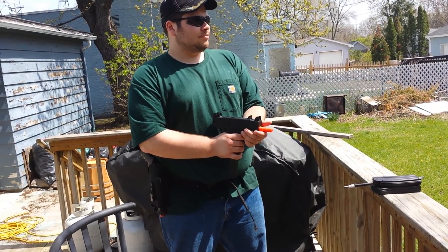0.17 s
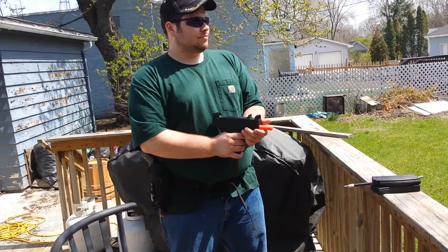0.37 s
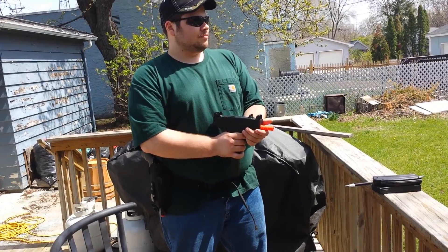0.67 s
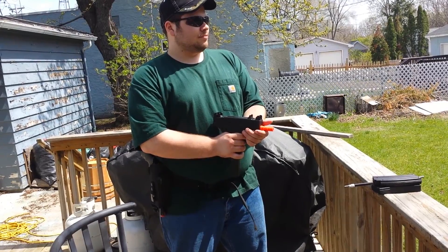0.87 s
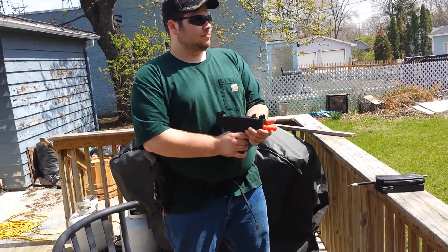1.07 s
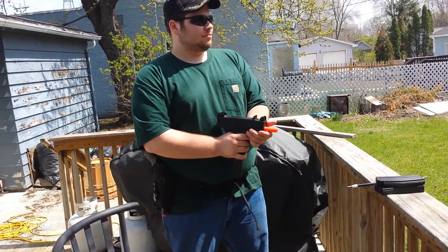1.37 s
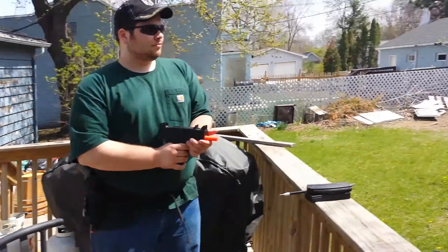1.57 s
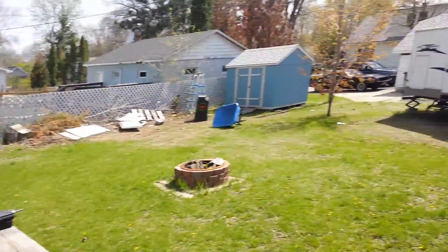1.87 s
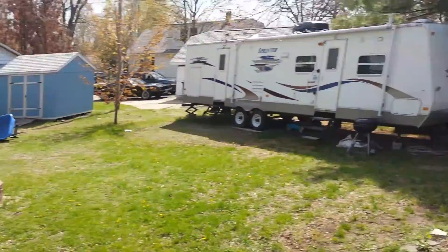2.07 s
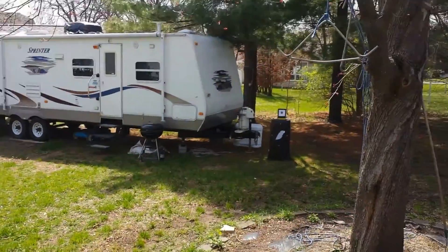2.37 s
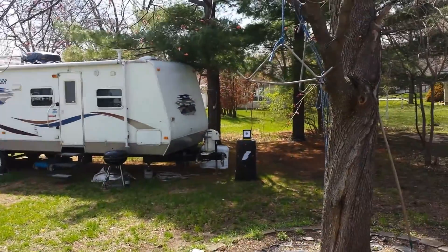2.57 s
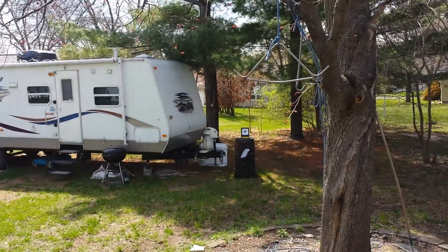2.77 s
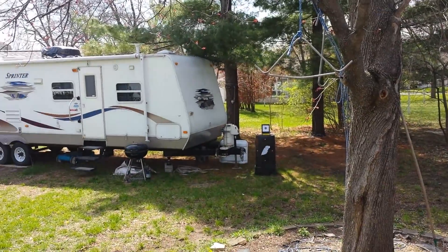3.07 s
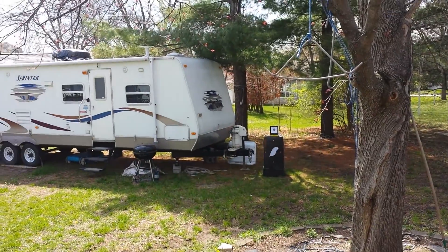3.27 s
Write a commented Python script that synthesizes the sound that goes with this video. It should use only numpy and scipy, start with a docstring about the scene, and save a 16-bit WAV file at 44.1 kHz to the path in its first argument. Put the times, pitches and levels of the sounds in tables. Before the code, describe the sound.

Close outdoor stereo pickup of an airsoft gun: light motor whirr, about three seconds of rapid snapping slams with whining gears and short yard reflections, tone shifting as the microphone turns, then a final whirr.

```python
"""In a backyard with faint air, an electric airsoft motor whirrs lightly, then the gun fires on full auto.
About eight times a second the piston slams into the plastic shell, and an action clack precedes most slams.
After each slam the gears whine as they wind the spring; walls and trees answer; one shot puffs on the ports.
Midway the microphone swings away: the gun changes colour, shifts in stereo and shows a low hum.
After the last shot the motor's whirr, made of grainy noise, returns. Contacts are noise and decaying modes."""
import sys
import numpy as np
from scipy import signal
from scipy.fft import rfft, irfft, next_fast_len
from scipy.io import wavfile
from scipy.ndimage import uniform_filter1d

SR = 44100
rng = np.random.default_rng(int(sys.argv[2]) if len(sys.argv) > 2 else 0)


def unload_audio(sound):
    """Save the sound as a 16-bit wav file, at the path given as the first command line argument."""
    columns = np.transpose(np.atleast_2d(sound))
    # keep every value between -1 and 1, then stretch to whole-number steps
    steps = np.round(np.clip(columns, -1, 1) * 32767)
    wavfile.write(sys.argv[1], SR, steps.astype(np.int16))


N = 152145  # length in samples
ALIKE = 0.47  # share of noise power common to both ports


def amp(db):
    """Decibels to linear amplitude."""
    return 10 ** (np.asarray(db) / 20)


def unit(x):
    """Scale to rms 1 over the whole array."""
    return x / np.sqrt(np.mean(x ** 2) + 1e-20)


def levelled(x, span_s):
    """Scale x to rms 1 over its first moments."""
    return x / np.sqrt(np.mean(x[:, :int(span_s * SR)] ** 2) + 1e-20)


def along(points, hz):
    """Read (frequency [Hz], value) points on a log frequency axis."""
    point_hz, value = np.transpose(points)
    return np.interp(np.log(hz + 1), np.log(point_hz + 1), value)


def curve(rows):
    """One value per sample from (time [s], value) rows."""
    return np.interp(np.arange(N) / SR, *np.transpose(rows))


def filtered(x, response):
    """Multiply the spectrum of x by a response of frequency."""
    n = x.shape[-1]
    padded = next_fast_len(n + 4096)
    gain = response(np.fft.rfftfreq(padded, 1 / SR))
    return irfft(rfft(x, padded) * gain, padded)[..., :n]


def coloured(x, points, size=2048):
    """Shape a stereo pair with a causal, minimum-phase filter from (frequency [Hz], level [dB])."""
    cepstrum = irfft(np.log(amp(along(points, np.fft.rfftfreq(size, 1 / SR)))))
    cepstrum[1:size // 2] *= 2
    cepstrum[size // 2 + 1:] = 0
    impulse = irfft(np.exp(rfft(cepstrum)))
    return signal.fftconvolve(x, impulse[None], axes=1)[:, :x.shape[1]]


def pair(n, alike=ALIKE):
    """White noise, partly alike at the two ports."""
    z, alike = rng.standard_normal((3, n)), np.clip(alike, 0, 1)
    return np.sqrt(alike) * z[0] + np.sqrt(1 - alike) * z[1:]


def wobble(hz):
    """A random curve of rms 1 that moves up to about this rate."""
    return unit(filtered(rng.standard_normal(N), lambda f: 1 / (1 + (f / hz) ** 2)))


# Colour of the still outdoor air: (frequency [Hz], relative level [dB])
AIR_COLOUR = [(25, -23), (60, -14), (105, -2.5), (170, -8.5), (400, -9.5), (1000, -11.5), (3000, -22),
              (14000, -40)]
AIR_DB = -63


def air():
    """Still outdoor air as a faint, steady, coloured noise."""
    return amp(AIR_DB) * unit(coloured(pair(N), AIR_COLOUR))


# Loudness of the whirr before, during and after the burst: (time [s], level [dB])
WHIRR_LEVEL = [(0, -42), (.055, -40.5), (.11, -52.5), (.17, -60.5), (.25, -61), (3.19, -68), (3.235, -38.5),
               (3.29, -30.5), (3.34, -33), (3.45, -32.5)]
# Colour of the whirr: (frequency [Hz], relative level [dB])
WHIRR_COLOUR = [(400, -24), (720, -46), (950, -19), (1550, -18), (2150, -4.5), (2700, -9.5), (3400, -21.5),
                (4770, -6), (6500, -1), (8600, -10), (14500, -19.5)]


def whirr():
    """The motor spinning with little load: a fine, grainy hiss."""
    grain = amp(1.7 * wobble(190))
    hiss = unit(coloured(rng.standard_normal((2, N)) * grain, WHIRR_COLOUR))
    return amp(curve(WHIRR_LEVEL)) * hiss


# Progress of the microphone's swing: (time [s], share of the swing)
TURN = [(1.6, 0.0041), (1.95, 0.28), (2.3, .9), (2.6, 0.99)]
LAG_S = .0005  # between the two ports at full swing


def add(out, s, x):
    """Mix in a sound; the left port hears it later as the microphone turns away."""
    lag = LAG_S * np.interp(s, *np.transpose(TURN))
    for port, start in enumerate((s + lag / 2, s - lag / 2)):
        part = out[port, int(start * SR):][:x.shape[1]]
        part += x[port, :len(part)]


def ring(modes, t):
    """Decaying modes, struck a little differently each time and heard differently at each port."""
    hz, db, t60 = np.transpose(modes)[:, :, None]
    z = rng.standard_normal((4, len(modes), 1))
    detuned_hz = hz * (1 + 0.01 * z[0])
    phase = 2 * np.pi * detuned_hz * t + hz / 8000 * z[2:]
    decay = amp(db + 1.95 * z[1] - 60 * t / t60)
    onset = 1 - np.exp(-t / 0.00033)
    return (decay * np.sin(phase)).sum(1) * onset


# Ringing gearbox: (frequency [Hz], relative level [dB], t60 [s])
GEARBOX_MODES = [(4596, -10, 0.035), (5066, -6, 0.018), (5703, -1.5, 0.026), (5850, -2, 0.023),
                 (6350, -3, 0.016), (6800, -3.5, 0.0083), (7390, -5, 0.051), (9890, -12.5, 0.031)]
# Ringing plastic shell: (frequency [Hz], relative level [dB], t60 [s])
SHELL_MODES = [(744, -12.5, 0.028), (1068, -2, 0.026), (1254, -9, 0.05), (1450, -4.5, 0.03),
               (1946, 3, .032), (2230, 0.5, 0.025)]
# Colour of the bright contact snap: (frequency [Hz], relative level [dB])
SNAP_COLOUR = [(1500, -47), (2800, -24), (4000, -18), (5200, -4.5), (6400, 0.5), (7300, -3), (8300, -13.5),
               (11000, -14), (14500, -24.5)]
# Colour of the knock on the shell: (frequency [Hz], relative level [dB])
KNOCK_COLOUR = [(200, -31), (600, -16), (1050, -2), (1600, -5.5), (2000, 1), (2800, -11), (3500, -8),
                (5000, -24)]
CRACK_HZ, CRACK_RISE_S = 6427, 0.00014  # the nearly pitched crack of each contact
KNOCK_ALIKE = 0.81  # share of knock power common to both ports


def impact(rows, voice):
    """Hard contacts: a crack, a bright snap and their rebound ring the gearbox, and the shell knocks."""
    crack_db, snap_db, snap_t60, gearbox_db, knock_db, knock_t60, shell_db = voice
    out, t = np.zeros((2, N)), np.arange(SR // 16) / SR
    u = t / CRACK_RISE_S
    for s, first_db, rebound_ms, rebound_db, body_db, *_ in rows:
        for at, db in ((s, first_db), (s + rebound_ms / 1e3, rebound_db)):
            hz = CRACK_HZ * (1 + .035 * rng.standard_normal())
            port_phase = 0.48 * rng.standard_normal((2, 1))
            crack = u ** 2 * np.exp(-u) * np.sin(2 * np.pi * hz * t + port_phase)
            # a very short burst on top of a longer tail
            snap_decay = amp(-60 * t / snap_t60) + 1.14 * amp(-60 * t / 0.0024)
            snap = coloured(pair(len(t)) * snap_decay, SNAP_COLOUR)
            parts = ((crack_db, crack), (snap_db, snap), (gearbox_db, ring(GEARBOX_MODES, t)))
            add(out, at, sum(amp(db + part_db) * levelled(part, 0.0012) for part_db, part in parts))
        knock = coloured(pair(len(t), KNOCK_ALIKE) * amp(-60 * t / knock_t60), KNOCK_COLOUR)
        knock = amp(knock_db) * levelled(knock, 0.014)
        shell = amp(shell_db) * levelled(ring(SHELL_MODES, t), 0.0086)
        add(out, s, amp(body_db) * (knock + shell))
    return out


# Clacks of the action, levels before the voice mix: (time [s], snap level [dB], rebound delay [ms],
# rebound level [dB], shell knock level [dB])
CLACKS = [(0.2221, -14.5, 1.54, -13, -27.5), (0.3574, -11, 1.65, -19.9, -27.5),
          (0.4744, -23.4, 4.37, -30.4, -35), (0.597, -11.5, 1.8, -19.9, -30.5),
          (0.7173, -11, 1.5, -21, -30.5), (0.8368, -13, 2.0, -24, -33.5), (0.957, -13.5, 2.11, -22, -32),
          (1.0776, -12.5, 2.0, -18.3, -32), (1.195, -29, 1.37, -43, -39.5), (1.315, -27, 2, -33, -37.8),
          (1.4395, -14.5, 2.0, -20, -31.5), (1.56, -14, 1.7, -19.8, -34), (1.6808, -12, 1.44, -21, -33),
          (1.8037, -9, 2.0, -18, -30.5), (1.9225, -14.5, 1.4, -18, -30.5), (2.0385, -27, 1.6, -29, -38.5),
          (2.1631, -10.5, 3.0, -31, -29.5), (2.283, -12, 2.8, -29, -34.5), (2.4032, -14.5, 1.8, -19, -31.5),
          (2.7668, -16, 2.3, -23, -32), (3.127, -17, 1.295, -20, -30)]
# Mix of a clack: (crack level [dB], snap level [dB], snap t60 [s], gearbox ring level [dB],
# knock level [dB], knock t60 [s], shell ring level [dB])
CLACK_VOICE = (0, -7, 0.04, -13, -4.5, 0.06, -1.5)


def action():
    """The action clacks just before most slams: hard contacts ring the gearbox and shell."""
    return impact(CLACKS, CLACK_VOICE)


# Piston slams, contact levels before the voice mix: (time [s], snap level [dB], rebound delay [ms],
# rebound level [dB], shell knock level [dB], thump level [dB], thump frequency [Hz])
SHOTS = [(0.2582, -13.5, 4.1, -15, -31, -41.5, 296), (0.3797, -12, 3.6, -16, -30, -40, 275),
         (0.4995, -10.5, 3.74, -10, -24.4, -44, 362), (0.6209, -13.5, 2.0, -15, -27.5, -42.3, 284),
         (0.7402, -7.5, 1.7, -16, -24, -44.5, 386), (0.8607, -9, 1.85, -13, -26, -46, 384),
         (0.9807, -9.5, 1.56, -11.5, -25.5, -44, 355), (1.101, -8, 1.6, -11.5, -25, -48.5, 346),
         (1.2204, -5.5, 2.2, -12, -26, -37, 235), (1.341, -9.5, 1.46, -10, -25, -64, 440),
         (1.4639, -16, 4.5, -16.5, -31.5, -42, 314), (1.5839, -8, 1.54, -11, -24, -43.1, 350),
         (1.7039, -5.5, 1.85, -11.2, -25, -50.5, 333), (1.825, -7.0, 1.4, -8.5, -23.5, -42, 337),
         (1.945, -12.5, 2.6, -11.5, -24.5, -43.5, 300), (2.0652, -10, 1.7, -5.5, -24, -55, 340),
         (2.1871, -12, 2.4, -23, -31, -43, 317), (2.3065, -8.5, 1.8, -14, -25, -45, 470),
         (2.427, -10, 4.1, -22, -24.5, -46.5, 484), (2.547, -14, 2.8, -9.5, -23.5, -44.3, 557),
         (2.6695, -10, 2, -18, -28.5, -60, 537), (2.7891, -13, 1.47, -14, -27, -46, 516),
         (2.9091, -16, 5.0, -11, -26, -41, 463), (3.0291, -9, 3.9, -16, -30.5, -41, 537),
         (3.15, -15.5, 4.55, -16.5, -33, -41.5, 547)]
# Mix of a slam: (crack level [dB], snap level [dB], snap t60 [s], gearbox ring level [dB],
# knock level [dB], knock t60 [s], shell ring level [dB])
SLAM_VOICE = (-1, -3, 0.0411, -14, -3, 0.06, -1.5)
# Colour of sliding and meshing parts: (frequency [Hz], relative level [dB])
GRIND_COLOUR = [(300, -26.5), (700, -13), (1100, 0), (1500, -8.5), (2100, -4.5), (2900, -7.5), (4200, -8),
                (6300, -4), (8500, -6.5), (14000, -18)]
THUMP_T60_S = .02
RUSH_S, RUSH_DB = 0.0026, -28  # width and peak of the sliding noise


def piston():
    """The piston's rush swells into the slam, which pushes a short thump of air from the barrel."""
    out, t = np.zeros((2, N)), np.arange(SR // 16) / SR
    for s, *_, db, hz in SHOTS:
        envelope = amp(-60 * t / THUMP_T60_S) * (1 - np.exp(-t / 0.00096))
        thump = np.sin(2 * np.pi * hz * t) * envelope * np.ones((2, 1))
        add(out, s, amp(db) * levelled(thump, .01))
        # starts early so that its peak meets the slam
        swell = np.exp(-((t - 2 * RUSH_S) / RUSH_S) ** 2)
        rush = unit(coloured(pair(len(t)), GRIND_COLOUR)) * swell
        add(out, s - 2 * RUSH_S, amp(RUSH_DB) * rush)
    return out + impact(SHOTS, SLAM_VOICE)


SAG_FROM_HZ, SAG_HZ_PER_S = 2170, 2300  # gear mesh, slowing as the spring tightens
WAVER_HZ, WHINE_WIDTH_HZ, WHINE_ROUGH_DB = 74.96, 193, 3  # unsteady gear mesh
WHINE_DB, LOAD_DB_PER_S, GRIND_DB = -42.5, 37, -43.5  # before the swing softens them
WIND_S, RELEASE_S = .104, 3.215  # winding per cycle; end of all winding
HUM_HZ, HUM_WIDTH_HZ, HUM_DB = 548, 52, -61  # heard as the microphone turns


def gears():
    """After each slam the gears wind the spring: a rough whine sags and swells over tooth noise."""
    t, slams = np.arange(N) / SR, np.array(SHOTS)[:, 0]
    since = t - slams[np.maximum(np.searchsorted(slams, t) - 1, 0)]
    active = (since > 0) & (since < WIND_S) & (t < RELEASE_S)
    winding = uniform_filter1d(active * 1.0, size=300)  # soft edges
    since = np.clip(since, 0, WIND_S)

    mesh_hz = SAG_FROM_HZ - SAG_HZ_PER_S * since + WAVER_HZ * wobble(60.6)
    phase = 2 * np.pi * np.cumsum(mesh_hz) / SR

    def flutter():
        """Slow noise that spreads the whine around its pitch."""
        return filtered(pair(N), lambda hz: 1 / (1 + (hz / WHINE_WIDTH_HZ) ** 2))

    carrier = flutter() * np.cos(phase) + flutter() * np.sin(phase)
    whine = unit(carrier * amp(WHINE_ROUGH_DB * wobble(77)))
    teeth = amp(5.4 * wobble(120))
    grind = unit(coloured(pair(N) * teeth, GRIND_COLOUR))
    hum_noise = pair(N, KNOCK_ALIKE)
    hum = unit(filtered(hum_noise, lambda hz: 1 / (1 + ((hz - HUM_HZ) / HUM_WIDTH_HZ) ** 2)))

    turn = curve(TURN)
    mesh = amp(WHINE_DB + LOAD_DB_PER_S * since) * whine + amp(GRIND_DB) * grind
    return winding * (turn * amp(HUM_DB) * hum + amp(-1.5 * turn) * mesh)


# Reverberation of the yard: (frequency [Hz], t60 [s])
YARD_DECAY = [(500, 0.2), (1000, 0.28), (2200, 0.54), (3200, 0.57), (6000, 0.4), (14000, 0.45)]
YARD_DB, YARD_DELAY_S = -11.5, 0.0069  # delay at the middle of the fade-in
WALL_S, WALL_SPREAD_S, WALL_DB = 0.021, 0.015, -20.5


def yard(x, count=8):
    """A near wall and the diffuse answer of fences and trees, drawn anew as the burst goes on."""
    out = np.zeros((2, N))
    for piece in np.array_split(np.arange(N), count):
        hz, t, z = signal.stft(rng.standard_normal((2, SR // 2)), SR, nperseg=256)
        decay = amp(-60 * t / along(YARD_DECAY, hz)[:, None])
        tail = signal.istft(z * decay, SR, nperseg=256)[1]
        t = np.arange(tail.shape[1]) / SR
        tail = tail * np.clip(t / YARD_DELAY_S - .5, 0, 1)
        wall_decay = (t > WALL_S) * np.exp(-np.abs(t - WALL_S) / WALL_SPREAD_S * 2)
        wall = rng.standard_normal(tail.shape) * wall_decay
        answer = amp(YARD_DB) * tail / np.linalg.norm(tail[0])
        answer = answer + amp(WALL_DB) * wall / np.linalg.norm(wall[0])
        wet = signal.fftconvolve(x[:, piece], answer, axes=1)[:, :N - piece[0]]
        out[:, piece[0]:piece[0] + wet.shape[1]] += wet
    return out


PUFF_S, PUFF_HZ, PUFF_T60_S = 1.2203, 100, 0.019
PUFF_DB, PUFF_PAN_DB = -20.5, 7  # pan raises the left and lowers the right


def puff():
    """One shot's air reaches the microphone as a low, decaying push on the ports."""
    t = np.maximum(np.arange(N) / SR - PUFF_S, 0)
    push = amp(PUFF_DB - 60 * t / PUFF_T60_S) * np.sin(2 * np.pi * PUFF_HZ * t)
    return push * amp([[PUFF_PAN_DB], [-PUFF_PAN_DB]])


# Colour of the gun once turned away: (frequency [Hz], gain [dB])
TURNED_COLOUR = [(200, -1.5), (580, 3.5), (800, -1.5), (1300, -2), (2000, -2), (3200, 2), (4200, 3.5),
                 (6300, -3), (8000, 2.5), (14000, -2)]


def turned_away(gun, turn):
    """Crossfade the gun from its direct colour to its off-axis colour."""
    return (1 - turn) * gun + turn * coloured(gun, TURNED_COLOUR)


PAN_DB, TURNED_PAN_DB = 0.53, 1.5  # left over right; further tilt at full swing
TURNED_WET_DB = -1  # change of the yard's answer at full swing


def scene():
    """The gun in its yard, heard from a turning microphone, over still outdoor air."""
    turn = curve(TURN)
    gun = turned_away(action() + piston() + gears(), turn)
    sound = whirr() + gun + amp(TURNED_WET_DB * turn) * yard(gun)
    pan = amp((PAN_DB + TURNED_PAN_DB * turn) * np.array([[.5], [-.5]]))
    return air() + pan * sound + puff()


# Port colour, added at the left and taken off at the right: (frequency [Hz], left over mid [dB])
PORT_COLOUR = [(100, 1), (1000, 0.5), (5500, 1), (7200, 0.5), (8500, -6.5), (12000, -2)]
CLIP_TOP, TOP_HZ = 0.87, 14700  # amplitude ceiling; upper band limit


def record(dry):
    """Each port has its own colour; the sharpest peaks clip smoothly, and the top is cut off."""
    x = filtered(dry, lambda hz: amp(along(PORT_COLOUR, hz) * np.array([[1], [-1]])))
    x = x / (1 + np.abs(x / CLIP_TOP) ** 6) ** (1 / 6)
    return filtered(x, lambda hz: 1 / (1 + (hz / TOP_HZ) ** 60))


dry = scene()
out = record(dry)
unload_audio(out)
```